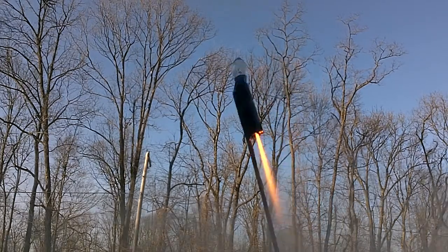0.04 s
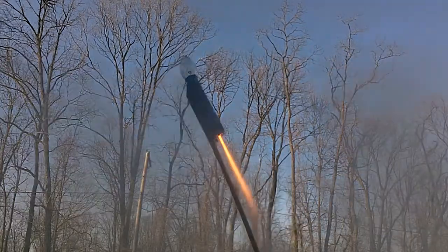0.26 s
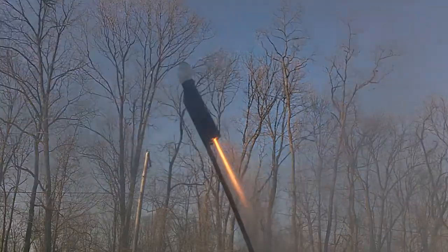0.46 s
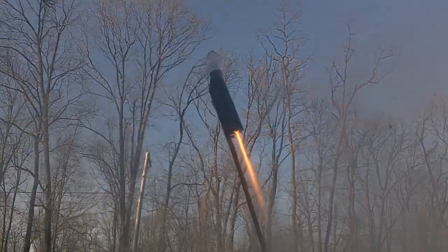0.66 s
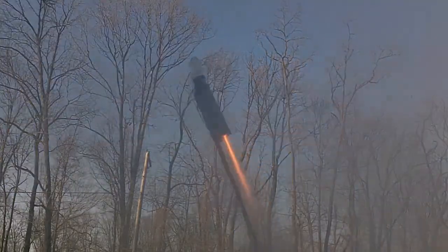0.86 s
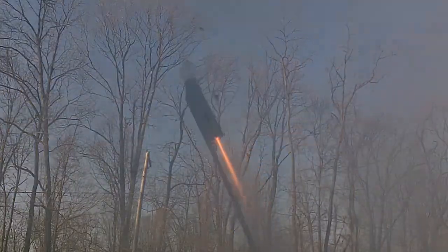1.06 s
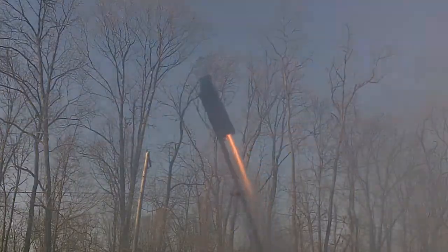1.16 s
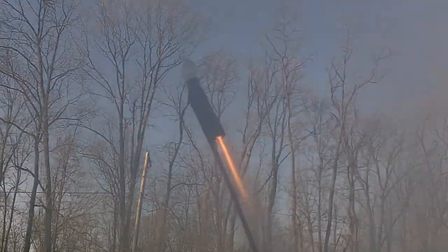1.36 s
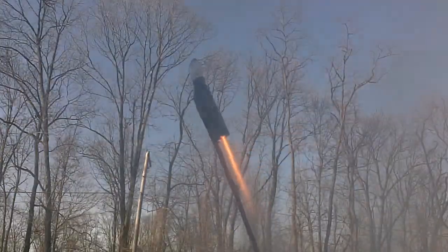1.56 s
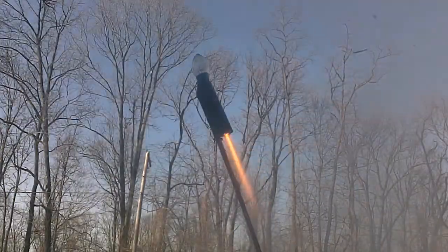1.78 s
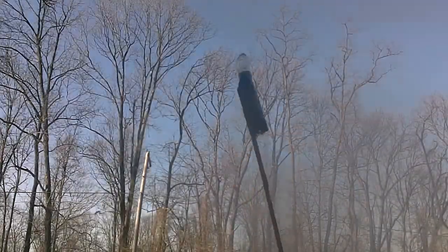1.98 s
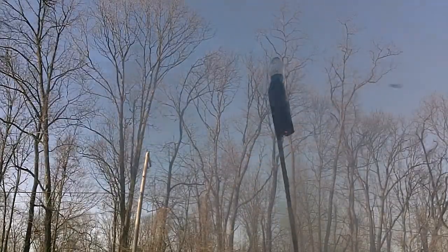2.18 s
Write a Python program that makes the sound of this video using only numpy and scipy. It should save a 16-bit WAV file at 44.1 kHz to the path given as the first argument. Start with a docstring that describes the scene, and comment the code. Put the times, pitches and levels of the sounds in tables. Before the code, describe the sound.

A model rocket motor burns close by outdoors, its loud, bright hiss running from the start over dense crackle, scattered sharp snaps and blunt low thuds. At about 1.9 seconds it cuts off abruptly with a short falling swish. After a brief dip, the spent casing's weaker, thin hiss swells in, with one small pop at about 2.1 seconds. The air rumbles faintly throughout.

```python
"""Model rocket motor on a stick

Outdoors, close up, on one mono microphone with deep notches in its treble. The jet hisses over a dense
crackle of small shocks and blunt pressure jolts, then cuts off with a falling swish as the fuel is spent.
The smouldering casing pops once; its weaker hiss is heard swelling back as the recorder's gain recovers
after the loud burn (drawn as a level curve). The air rumbles faintly throughout."""
import sys
import numpy as np
from scipy import signal
from scipy.fft import rfft, irfft
from scipy.io import wavfile

SR = 44100
rng = np.random.default_rng(int(sys.argv[2]) if len(sys.argv) > 2 else 0)


def transcribe(u):
    """Save the signal u as a 16-bit wav file named by the first command-line argument.

    u: samples, shape (n,) or (channels, n), limited to [-1, 1]; the rate is SR.
    q: integer samples, one column per channel.
    """
    v = np.clip(np.atleast_2d(u).T, -1, 1)
    q = np.round(v * 32767).astype(np.int16)
    wavfile.write(sys.argv[1], SR, q)


N = 98343

# the jet's hiss in four bands, low to high, before trims: time_s, band1_db, band2_db, band3_db, band4_db
HISS_LEVELS = [(0.0, -23, -26, -24, -21), (0.042, -16.5, -22.5, -15.5, -11.5),
               (0.11, -15.5, -18.5, -14, -10.5), (0.206, -16, -14.5, -14.5, -14.5),
               (0.254, -17.5, -16.5, -17.5, -14), (0.28, -17, -19, -18, -19),
               (0.374, -15.5, -20, -16, -13.5), (0.56, -15.5, -18, -18, -16),
               (0.592, -16.5, -18.5, -15.5, -13.5), (0.804, -17.5, -18, -16.5, -12),
               (0.878, -17.5, -18, -18, -16), (1.122, -18.5, -24.5, -19, -16.5),
               (1.19, -20, -20, -16.5, -14), (1.258, -18, -23, -16.5, -15), (1.296, -18, -17, -15.5, -15),
               (1.48, -18.5, -19.5, -18, -15.5), (1.84, -19.5, -17.5, -15, -13.5),
               (1.9, -16.5, -18.5, -18, -16)]
# bounds of those bands: edge_hz
HISS_EDGES = [2700, 5490, 7880, 10940, 16000]
# gain added to each band: trim_db
HISS_TRIMS = [2.12, 3.2, 2.3, 1.64]
# spectrum of the hiss: frequency_hz, gain_db
HISS_COLOUR = [(2700, -0.5), (3400, 1), (4200, 0), (5000, -5), (6000, -1.5), (6800, 0.5), (7600, -3),
               (8600, -3), (9200, 1), (9700, 3.5), (10300, 3), (11500, -3), (12700, 0.5), (14000, -2),
               (15200, -6.5)]
# spectrum of the rush just under the hiss: frequency_hz, gain_db
RUSH_COLOUR = [(100, -5), (700, -12), (1400, -14), (2200, -1), (2700, 3.5), (3300, -38), (6000, -50)]
# strength of the crackle, before its trim: time_s, level_db
CRACKLE_LEVELS = [(0.0, -40), (0.058, -18.5), (0.226, -15), (0.274, -27), (0.48, -18), (0.55, -30.5),
                  (0.592, -21), (0.798, -17), (0.808, -24.5), (1.052, -30), (1.062, -25.5), (1.078, -30.5),
                  (1.444, -21.5), (1.492, -32), (1.56, -25), (1.576, -32.5), (1.72, -18.5), (1.9, -24)]
# spectrum of the crackle: frequency_hz, gain_db
CRACKLE_COLOUR = [(40, -51), (150, -3), (350, -0.5), (1200, 0), (2300, 1.5), (3500, -6), (6000, 4),
                  (15000, -32)]
# strength of the pressure jolts, before their trim: time_s, level_db
JOLT_LEVELS = [(0, -38), (.045, -18.5), (.19, -27.5), (.262, -17), (.3, -22), (.335, -18), (.44, -20),
               (.7, -21), (.95, -20), (1.07, -20), (1.095, -40), (1.125, -28), (1.3, -19.5), (1.45, -18.5),
               (1.495, -29.5), (1.54, -14.5), (1.585, -26), (1.7, -22), (1.79, -23), (1.856, -18.5),
               (1.9, -27)]
# high resonance of the jet, strongest late in the burn: time_s, pitch_hz, level_db
SING_PATH = [(0, 9870, -32), (.17, 9950, -25), (.4, 9900, -28), (1.1, 9720, -25.5), (1.3, 9450, -17.5),
             (1.55, 9580, -21), (1.8, 9580, -15), (1.9, 9600, -22)]
# spectrum of the air's rumble: frequency_hz, gain_db
RUMBLE_COLOUR = [(15, 6.5), (35, 4), (80, -4.5), (160, -30), (500, -33), (2000, -79)]
# the jet's strongest single shocks: start_s, relative_level_db
CRACKS = [(0.253, -8), (0.321, -6), (0.33, -4), (0.377, -7.5), (0.493, -6.0), (0.531, -12), (0.605, -5.0),
          (0.632, 0), (0.732, -3), (0.784, -1.5), (0.887, -10), (0.894, -14), (0.949, -2), (1.004, -13),
          (1.067, -7), (1.121, -8), (1.24, -9), (1.364, -6.0), (1.456, -5), (1.475, -7), (1.534, -12),
          (1.614, -5.5), (1.653, -12), (1.765, -6), (1.847, -6), (1.893, -5)]
# resonance that sinks as the flame dies: time_s, pitch_hz, level_db
SWISH_PATH = [(1.85, 4680, -50), (1.89, 4200, -28), (1.92, 3664, -21), (1.95, 3250, -27.5),
              (1.975, 3080, -54), (2.02, 3100, -77)]
# casing hiss as heard while the recorder's gain recovers, first level held from 0 s: time_s, level_db
SMOULDER_LEVELS = [(1.93, -27), (2.0, -39.5), (2.04, -34), (2.09, -26), (2.14, -21.5), (2.2, -22),
                   (2.23, -22.5)]
# spectrum of the casing's hiss: frequency_hz, gain_db
SMOULDER_COLOUR = [(100, -19), (600, -15.5), (1400, -17.5), (2200, -7), (3400, -2.5), (5000, -3.5),
                   (6700, 2.5), (8000, -7), (9000, 0.5), (9550, 6), (10400, -4.5), (12500, 3.5),
                   (15000, -5.5)]
# ring of the casing when it pops: pitch_hz, relative_level_db, t60_s
POP_MODES = [(395, -14, 0.014), (1970, -3.5, 0.014), (3300, 1.5, 0.0085), (3950, -6, .004),
             (4480, -7, 0.0066)]
# notches of the microphone: centre_hz, half_width_hz
MIC_NOTCHES = [(2705, 450), (5495, 440), (7880, 676), (7890, 220), (10940, 620)]

HISS_BURNOUT = dict(start_s=1.911, fall_db_per_s=404)
SHOCK_BURNOUT = dict(start_s=1.912, fall_db_per_s=750)
TIME_S = np.arange(N) / SR
BIN_HZ = np.arange(N + 1) * SR / (2 * N)


def undb(db):
    """Decibels to amplitude."""
    return 10 ** (np.asarray(db) / 20)


def unit(x):
    """Scale to rms 1."""
    return x / np.sqrt(np.mean(x ** 2))


def curve(rows, column=1):
    """A column of a table, joined by straight lines in time."""
    rows = np.array(rows)
    return np.interp(TIME_S, rows[:, 0], rows[:, column])


def shape(x, gain):
    """Filter by a gain for each frequency."""
    return irfft(rfft(x, 2 * N) * gain)[:N]


def colour(points):
    """Gain for each frequency from (Hz, dB) points."""
    hz, db = np.array(points).T
    return undb(np.interp(np.log(BIN_HZ + 1), np.log(hz), db))


def noise(gain):
    """Coloured noise of rms 1."""
    return unit(shape(rng.standard_normal(N), gain))


def wander(per_s):
    """Glide between random values, per_s of them a second."""
    return np.interp(TIME_S * per_s, np.arange(N), rng.standard_normal(N))


def lag(x, seconds):
    """One-pole smoothing."""
    pole = np.exp(-1 / (SR * seconds))
    return signal.lfilter([1 - pole], [1, -pole], x)


def shocks(per_s, fall_s, scatter_db):
    """Sudden pressure steps of either sign at random moments, each relaxing back."""
    hits = rng.random(N) < per_s / SR
    signs = np.sign(rng.standard_normal(N))
    sizes = undb(scatter_db * np.clip(rng.standard_normal(N), -2, 2))
    return lag(hits * signs * sizes / np.sqrt(per_s), fall_s)


def burnout(start_s, fall_db_per_s):
    """Full strength until the fuel is spent, then a fast fall."""
    return undb(-fall_db_per_s * np.maximum(TIME_S - start_s, 0))


def resonance(path, width_hz):
    """A narrow band of noise whose centre and level move."""
    lowpass = 1 / (1 + (2 * BIN_HZ / width_hz) ** 4)
    phase = 2 * np.pi * np.cumsum(curve(path)) / SR
    band = noise(lowpass) * np.cos(phase) + noise(lowpass) * np.sin(phase)
    return band * undb(curve(path, column=2))


def jet_hiss(rush_trim_db=-6.5, flicker_db=0.92, flutter_db=0.5):
    """The jet's treble bands flicker alone and flutter together, over a rush that follows the lowest."""
    hiss = noise(colour(RUSH_COLOUR)) * undb(curve(HISS_LEVELS) + rush_trim_db)
    for k, trim_db in enumerate(HISS_TRIMS):
        in_band = (BIN_HZ >= HISS_EDGES[k]) & (BIN_HZ < HISS_EDGES[k + 1])
        level_db = curve(HISS_LEVELS, column=k + 1) + trim_db + flicker_db * wander(per_s=45)
        hiss += noise(colour(HISS_COLOUR) * in_band) * undb(level_db)
    flutter = undb(flutter_db * wander(per_s=130))
    return hiss * flutter * burnout(**HISS_BURNOUT)


def jet_crackle(trim_db=1.7):
    """Small shocks in the jet crowd closer as the crackle grows louder."""
    level_db = curve(CRACKLE_LEVELS)
    per_s = 1100 * undb(level_db + 20)  # 1100 a second where the table reads -20 dB
    steps = shocks(per_s, fall_s=0.00022, scatter_db=3)
    crackle = unit(shape(steps, colour(CRACKLE_COLOUR)))
    return crackle * undb(level_db + trim_db) * burnout(**SHOCK_BURNOUT)


def jet_jolts(rise_s=0.00008, limit_rms=1.76, trim_db=-0.5):
    """Slower, blunter pressure jolts make the jet's bass."""
    jolts = lag(shocks(per_s=170, fall_s=0.0015, scatter_db=1.5), rise_s)
    jolts -= lag(jolts, seconds=0.0066)  # take out the slow drift
    jolts = np.tanh(unit(jolts) / limit_rms)  # jolts that pile up level off
    return unit(jolts) * undb(curve(JOLT_LEVELS) + trim_db) * burnout(**SHOCK_BURNOUT)


def jet_sing():
    """A high resonance sings in the hiss while the fuel burns."""
    return resonance(SING_PATH, width_hz=530) * burnout(**HISS_BURNOUT)


def air_rumble(level_db=-41.5):
    """The open air rumbles low and steady at the microphone."""
    return noise(colour(RUMBLE_COLOUR)) * undb(level_db)


def jet_cracks(rise_s=0.00008, fall_s=0.00071, trim_db=0.5):
    """Lone shocks stand out of the crackle: a steep front, then the pressure relaxes."""
    fronts = np.zeros(N)
    for start_s, level_db in CRACKS:
        fronts[int(start_s * SR)] += undb(level_db + trim_db) * rng.choice([-1, 1])
    relaxing = lag(fronts, fall_s) * fall_s * SR  # scaled to keep each front's height
    return lag(relaxing, rise_s)


def dying_swish():
    """A resonance of the jet sinks as the flame dies."""
    return resonance(SWISH_PATH, width_hz=740)


def casing_smoulder():
    """The casing's thin hiss, heard dipping, then swelling as the recorder's gain recovers (drawn in)."""
    return noise(colour(SMOULDER_COLOUR)) * undb(curve(SMOULDER_LEVELS))


def casing_pop(start_s=2.1059, gain_db=-15):
    """One small pop rings the spent casing for a moment."""
    age_s = np.maximum(TIME_S - start_s, 0)
    ring = np.zeros(N)
    for pitch_hz, level_db, t60_s in POP_MODES:
        ring += np.sin(2 * np.pi * pitch_hz * age_s) * undb(level_db - 60 * age_s / t60_s)
    return ring * undb(gain_db)


def scene():
    """The motor close by in open air, the same in both channels."""
    jet = jet_hiss() + jet_crackle() + jet_jolts() + jet_cracks() + jet_sing() + dying_swish()
    mono = jet + casing_smoulder() + casing_pop() + air_rumble()
    return np.array([mono, mono])


def record(dry, notch_floor=0.005, top_hz=15250):
    """The microphone carves its notches, peaks past full scale clip, and the top is cut."""
    response = 1
    for centre_hz, half_width_hz in MIC_NOTCHES:
        detuning = centre_hz ** 2 - BIN_HZ ** 2
        damping = 2j * BIN_HZ * half_width_hz
        response = response * (detuning + damping * notch_floor) / (detuning + damping)
    clipped = np.clip([shape(channel, response) for channel in dry], -1, 1)
    top_cut = signal.firwin(1023, top_hz, fs=SR)
    return np.array([np.convolve(channel, top_cut, "same") for channel in clipped])


dry = scene()
out = record(dry)
transcribe(out)
```